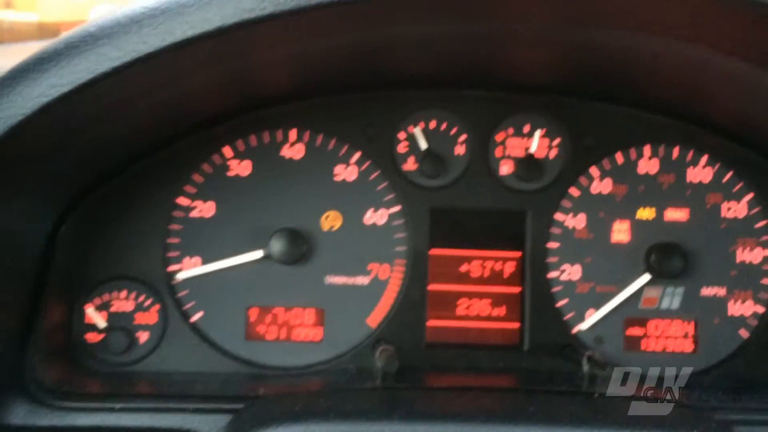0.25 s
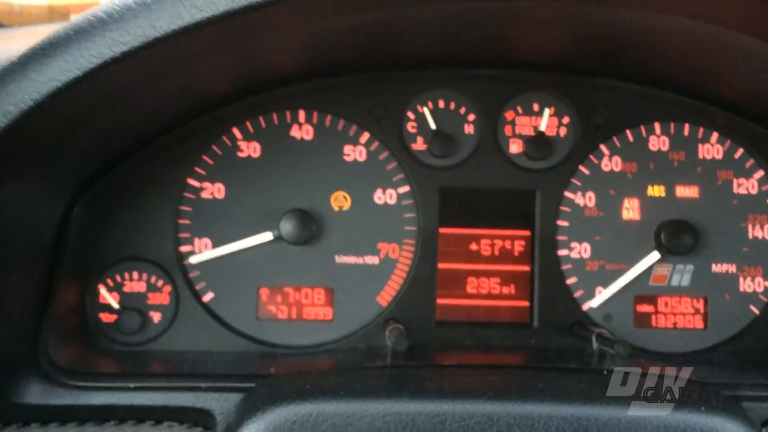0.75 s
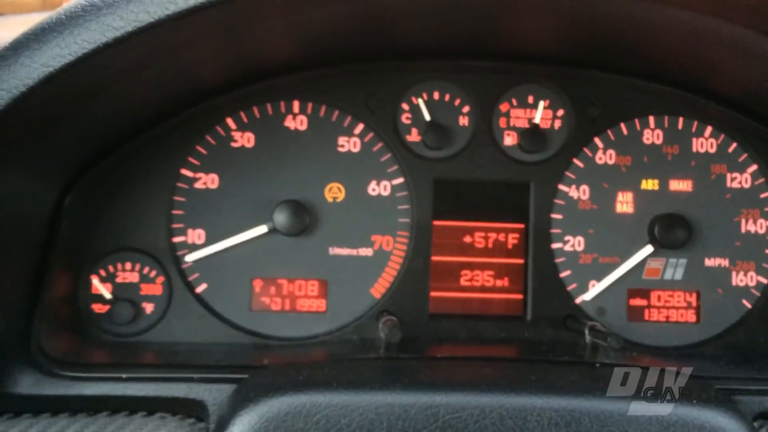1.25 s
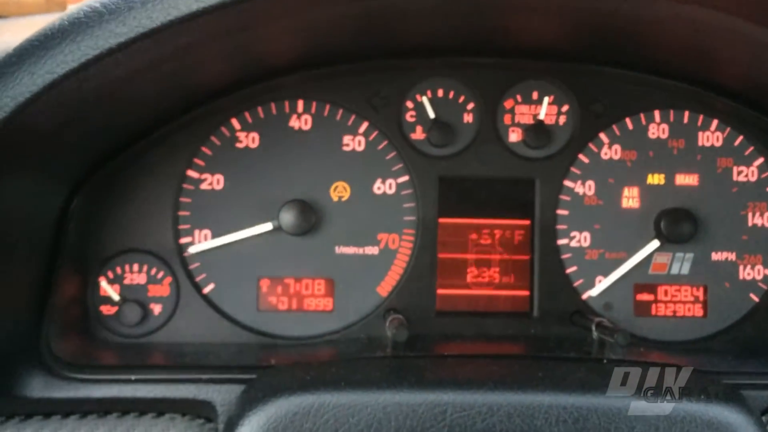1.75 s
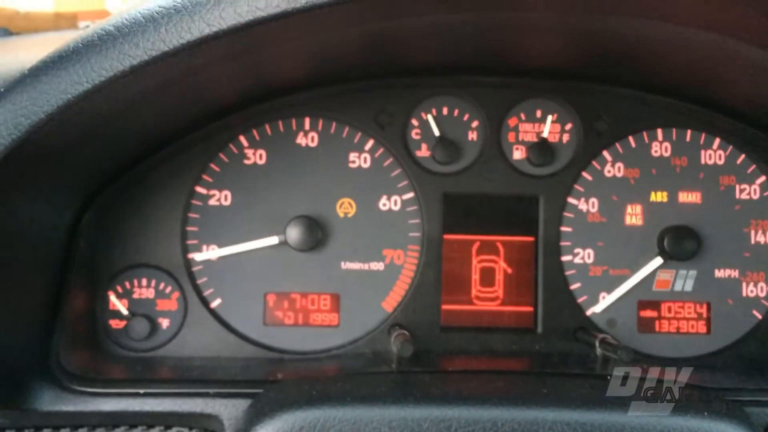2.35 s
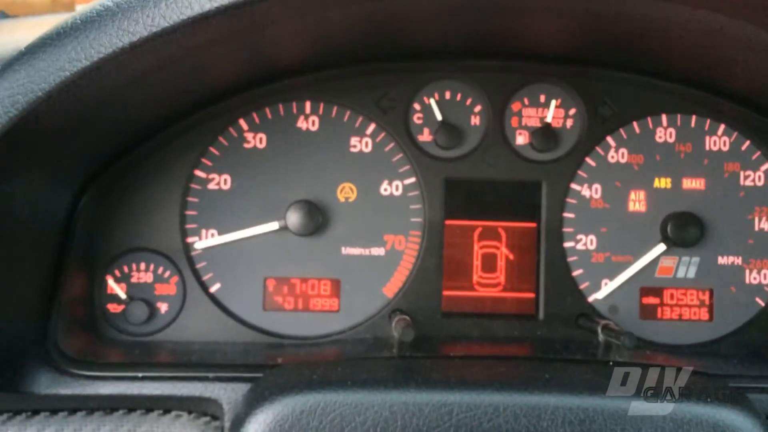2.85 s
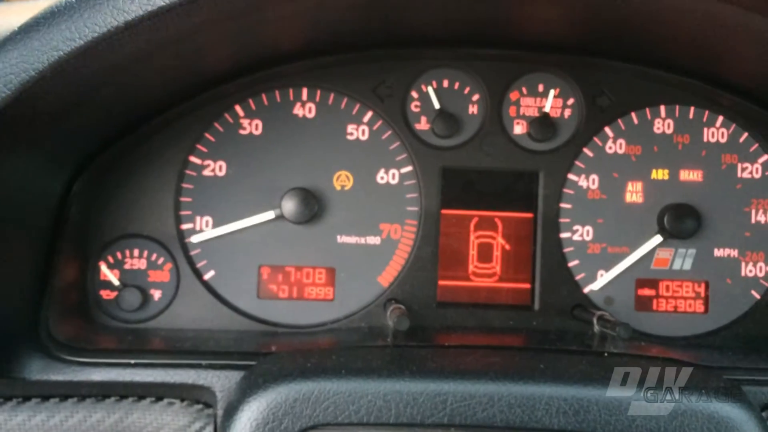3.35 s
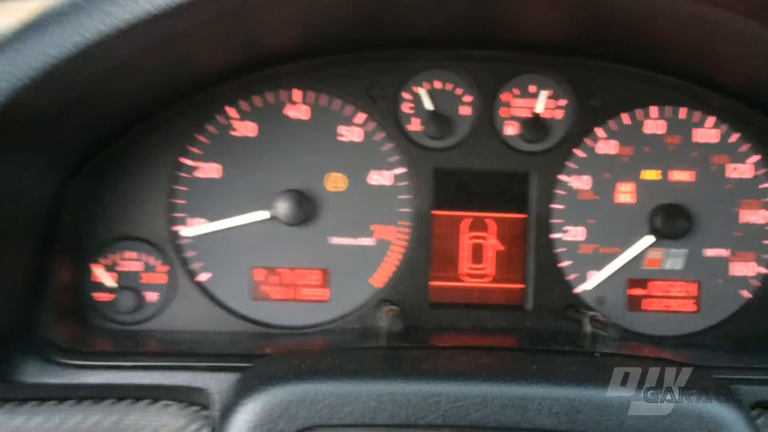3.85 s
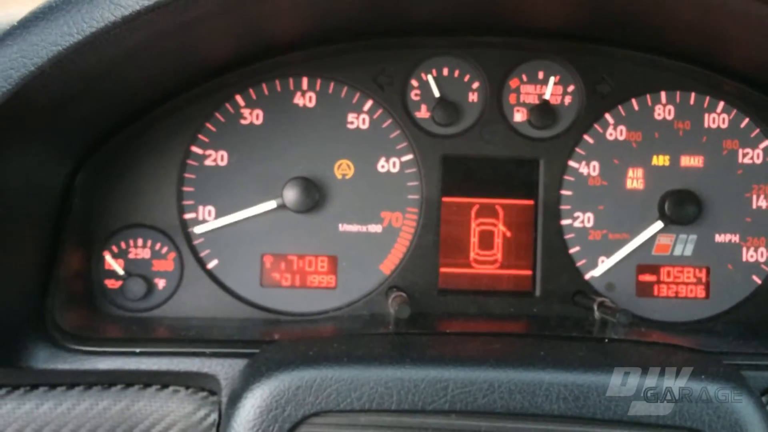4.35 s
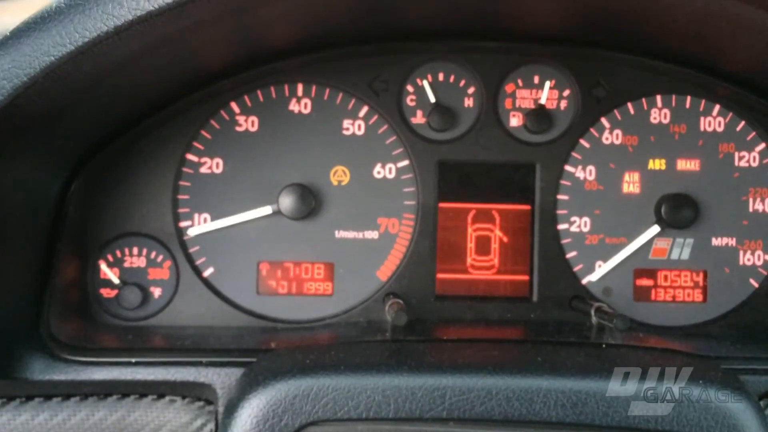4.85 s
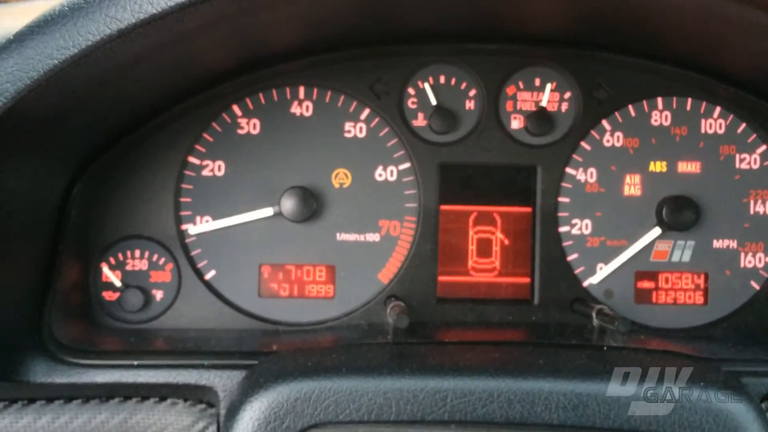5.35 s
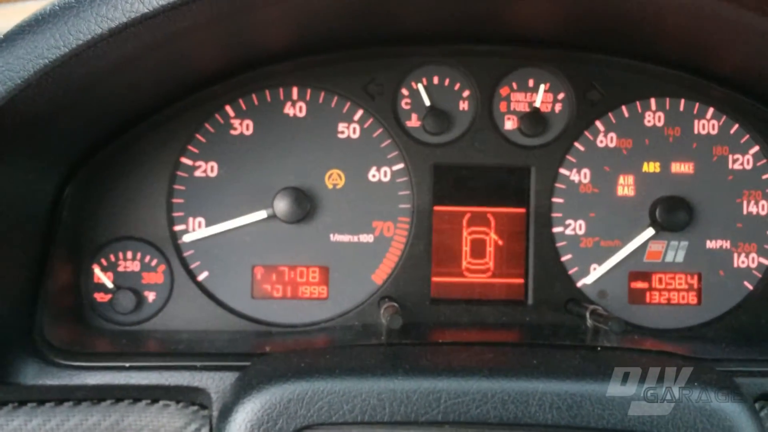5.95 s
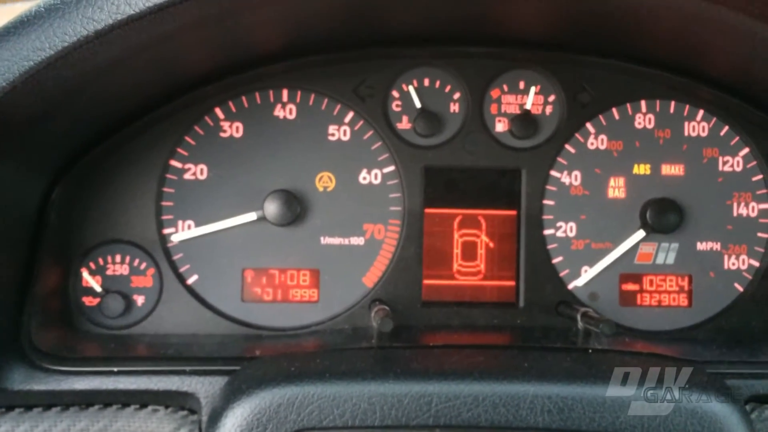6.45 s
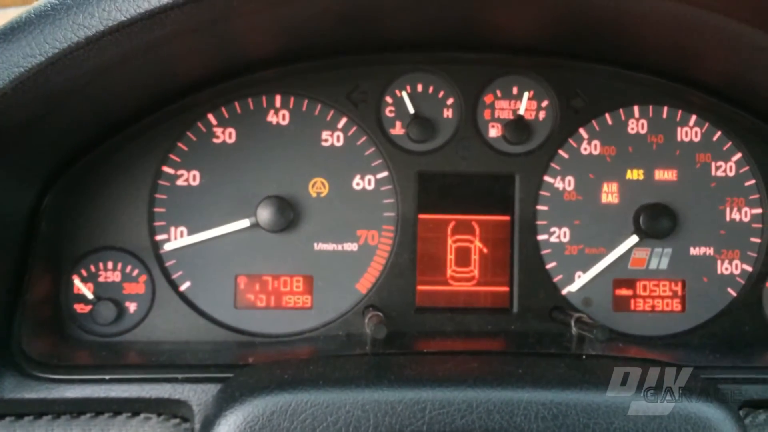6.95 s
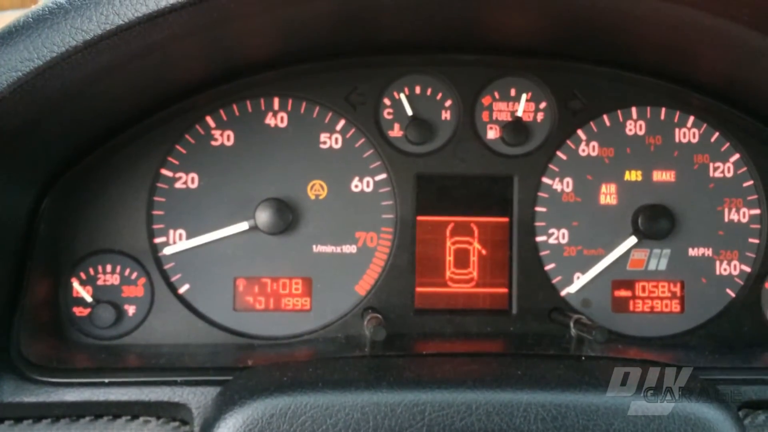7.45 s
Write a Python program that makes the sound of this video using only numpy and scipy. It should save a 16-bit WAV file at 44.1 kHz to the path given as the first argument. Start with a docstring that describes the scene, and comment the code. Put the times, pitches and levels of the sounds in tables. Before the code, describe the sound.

Inside a car, a low rough engine drone booms at idle. A sharp clack at one second coincides with the first stumble; the outside engine rush then grows louder as a latch cracks and the door swings open with clustered thuds, ringing and rubbing. The clatter thins out, leaving the engine faltering into lone thumps and surging back several times, with faint bird chirps. The drone drops again at the very end.

```python
"""A misfiring car engine idles, heard from the driver's seat; firing orders add up to its boom in the cabin.
Lock and handle clack, and the engine bay's rush, made of coloured noise, grows louder.
Then the latch lets go and the door swings open: cracks, ringing, thuds and rubbing.
Meanwhile the engine stumbles four times, with single thumps, and surges back. A few gliding tones
are faint bird calls. At the very end the drone cuts out once more."""
import sys
import numpy as np
from scipy import signal
from scipy.fft import rfft, irfft, next_fast_len
from scipy.io import wavfile
from scipy.ndimage import map_coordinates

SR = 44100
rng = np.random.default_rng(int(sys.argv[2]) if len(sys.argv) > 2 else 0)


def store_wav(level_fs):
    """Save 16-bit WAV to argv[1]."""
    pcm = np.round(np.clip(np.atleast_2d(level_fs), -1, 1) * 32767)
    wavfile.write(sys.argv[1], SR, pcm.T.astype(np.int16))


N = 340011


def amp(db):
    """Turn decibels into a gain."""
    return 10 ** (np.asarray(db) / 20)


def unit(x):
    """Scale x to rms 1."""
    return x / np.sqrt(np.mean(x ** 2) + 1e-20)


def ramp(times, values):
    """Join the points with straight lines, one value per sample."""
    return np.interp(np.arange(N) / SR, times, values)


def wobble(rate):
    """Draw a smooth random curve with this many knots a second."""
    knots = rng.standard_normal(int(N * rate / SR) + 4)
    return map_coordinates(knots, [np.arange(N) * rate / SR])


def filtered(x, response):
    """Multiply the spectrum of x by a response given as a function of frequency."""
    m = next_fast_len(2 * len(x))
    return irfft(rfft(x, m) * response(np.fft.rfftfreq(m, 1 / SR)), m)[:len(x)]


def noise(spectrum, size=N):
    """Make noise of rms 1, coloured by (Hz, dB) points."""
    f, db = np.transpose(spectrum)
    colour = lambda hz: amp(np.interp(np.log(hz + 1), np.log(f), db))
    return unit(filtered(rng.standard_normal(size), colour))


def resonances(modes, f):
    """Add up the responses of damped resonances, each a (Hz, width in Hz, dB) mode."""
    return sum(amp(db) * 1j * f * w / (c * c - f * f + 1j * f * w) for c, w, db in modes)


def ringing(modes, t, longest_s):
    """Let (Hz, dB, t60 in s) modes ring and die away, at new strengths for every blow."""
    total = np.zeros(len(t))
    for hz, db, t60 in modes:
        strength_db = db + 3 * rng.standard_normal()
        decay = amp(strength_db - 60 * t / min(t60, longest_s))
        total += decay * np.sin(2 * np.pi * (hz * t + rng.random()))
    return total


def butter(x, edge_hz, kind, order):
    """Low-pass or high-pass x without looking ahead."""
    return signal.sosfilt(signal.butter(order, edge_hz, kind, fs=SR, output="sos"), x)


def add(track, s, sound):
    """Mix a sound into the track at time s."""
    part = track[max(round(s * SR), 0):][:len(sound)]
    part += sound[:len(part)]


def fading_out(start_s, length_s):
    """Give 1 until start_s, then fall to 0 in a straight line."""
    return ramp([start_s, start_s + length_s], [1, 0])


# engine speed: t/s, firing rate f/Hz
ENGINE_SPEED = [(0.0, 44.2), (0.26, 41.15), (0.88, 40.2), (0.99, 38.9), (1.16, 29.97), (1.33, 30.95),
                (1.46, 40.3), (1.59, 45.9), (1.8, 48.83), (2.06, 49.3), (2.75, 45.25), (2.88, 42.38),
                (3.0, 32.68), (3.24, 43.96), (3.39, 46.5), (3.56, 47.73), (4.08, 43.5), (4.34, 30.96),
                (4.57, 44.25), (4.74, 47.75), (4.92, 48.65), (5.33, 45.2), (5.45, 34.74), (5.52, 33.93),
                (5.84, 45.95), (5.99, 46), (6.72, 41.89), (7.56, 40.6), (7.71, 38.6)]


def engine_speed():
    """The firing rate falls when the engine stumbles and climbs when it recovers."""
    times, rates_hz = np.transpose(ENGINE_SPEED)
    return ramp(times, rates_hz)


# stumbles: firing cuts out t/s, catches again t/s, change of drone level/dB
STUMBLES = [(1.024, 1.402, -16), (2.762, 3.156, -13.5), (4.085, 4.494, -11.5), (5.334, 5.661, -6.5),
            (7.659, 8.0, -10)]
# the drone drops within CUT_S, drifts to CREEP_DB, and returns in full within CATCH_S
CUT_S, CREEP_DB, CATCH_S = 0.032, -9, 0.065
# surges of extra fuel: t/s, level/dB
SURGES = [(0.082, 7), (1.53, 4), (2.75, 3), (3.19, 3), (4.06, 3), (4.55, 5), (5.74, 1)]
SURGE_WIDTH_S = 0.044


def effort():
    """Strength of combustion in dB: it drops in each stumble and rises in each surge."""
    t = np.arange(N) / SR
    total_db = np.zeros(N)
    for cut, catch, drop_db in STUMBLES:
        total_db += ramp([cut, cut + CUT_S, catch - CATCH_S, catch], [0, drop_db, CREEP_DB, 0])
    for s, surge_db in SURGES:
        total_db += surge_db * np.exp(-((t - s) / SURGE_WIDTH_S) ** 2)
    return total_db


# how loudly a firing order booms at the seat: f/Hz, level/dB
SEAT_BOOM = [(30, -27), (40, -25), (44, -22), (62, -18), (82, -20), (95, -22), (120, -31), (130, -30),
             (146, -31.5), (162, -31.5), (174, -25.5), (188, -19.5), (194, -23), (199, -29.5)]
# early change for firing orders 1 to 4, which then fades out: level/dB
EARLY_ORDER_DB = [-3.5, -8, 3.5, -6.5]
# the drone's balance changes from BALANCE_SHIFTS_S over SHIFT_S
BALANCE_SHIFTS_S, SHIFT_S = 1.8, 0.24


def order_levels(firing_hz):
    """Each firing order follows the effort and swells as the speed carries it through a boom."""
    hz, boom_db = np.transpose(SEAT_BOOM)
    drive_db, early = effort(), fading_out(BALANCE_SHIFTS_S, SHIFT_S)
    return [drive_db + early_db * early + np.interp(np.log(k * firing_hz), np.log(hz), boom_db)
            for k, early_db in enumerate(EARLY_ORDER_DB, 1)]


# air resonances of the cabin: f/Hz, width f/Hz, level/dB
CABIN_AIR = [(41.8, 17, -16), (82, 31, 3.5), (121.7, 28, 3), (170.9, 20.5, 0)]


def cabin(pushes, muffle_hz=215):
    """Pressure pushes boom in the cabin air; the body shuts out their upper range."""
    boom = filtered(pushes, lambda f: resonances(CABIN_AIR, f))
    return butter(boom, muffle_hz, "low", order=7)


# body panels that pick out the weak upper orders: f/Hz, width f/Hz, level/dB
BODY_PANELS = [(199, 5, -36), (285.7, 24, -45), (367.5, 17, -53.5), (466, 16, -55)]


def exhaust(firing_hz, firing_count):
    """Firing orders, whole multiples of the firing rate, drone; cylinders that burn unevenly roughen them."""
    order_db = order_levels(firing_hz)
    drone = np.zeros(N)
    for k, db in enumerate(order_db, 1):
        # the cabin's top resonance shifts the phase of the orders near it
        lag = 2 * np.angle(resonances(CABIN_AIR[-1:], k * firing_hz))
        flutter_db = 1.66 * wobble(30)
        drone += np.sqrt(2) * amp(db + flutter_db) * np.cos(2 * np.pi * k * firing_count + lag)
    power = np.sqrt(sum(amp(db) ** 2 for db in order_db))

    # upper orders stand out as they pass through a panel resonance
    upper = np.zeros(N)
    for k in range(5, 13):
        rotating = np.exp(2j * np.pi * k * firing_count)
        upper += amp(4.7 * wobble(7)) * np.real(resonances(BODY_PANELS, k * firing_hz) * rotating)

    # each firing is stronger or weaker than the mean, partly by cylinder and partly by chance
    firings = np.flatnonzero(np.diff(np.floor(firing_count)))
    by_cylinder = np.resize([0.8, -0.83, 1.5, -0.74, 0.0, -2.0], len(firings))
    pushes = np.zeros(N)
    pushes[firings] = rng.standard_normal(len(firings)) + by_cylinder
    uneven = amp(-11) * power * unit(cabin(pushes))
    shudder = amp(-37) * unit(cabin(rng.standard_normal(N)))
    return drone + upper * unit(power) + uneven + shudder


# colour of the engine bay's rush: f/Hz, level per Hz/dB
BAY_RUSH = [(100, 12), (250, 5.5), (400, 2), (600, -5), (850, -6), (1150, -11), (1500, -16), (2000, -14),
            (2600, -19.5), (3500, -24.5), (6000, -37.5), (12000, -69.5)]
# colour of the intake hiss: f/Hz, level per Hz/dB
INTAKE_HISS = [(1470, -20), (2500, -7.5), (2820, -9.5), (3420, -8), (4110, -3), (4640, -4.5), (13900, -12),
               (15500, -17)]
# ringing of the engine's covers: f/Hz, width f/Hz, level/dB
ENGINE_COVERS = [(474, 17, -8.5), (967, 20, 3), (1355, 185, 3.5), (1690, 20, 1.5)]
# colour of the growl through the bulkhead: f/Hz, level per Hz/dB
BULKHEAD_GROWL = [(20, -4.5), (60, 2.5), (200, 6), (280, -12.5), (400, -9), (520, -16), (800, -39),
                  (2500, -73)]
# rush and hiss start lower by these levels (dB) and grow louder from RUSH_GROWS_S over GROW_S
EARLY_RUSH_DB, EARLY_HISS_DB = -8, -3
RUSH_GROWS_S, GROW_S = 1.12, 0.084


def engine_bay(firing_hz, firing_count):
    """Belts, fan and valve gear rush and throb with the firings; a low growl comes through the bulkhead."""
    early = fading_out(RUSH_GROWS_S, GROW_S)
    revs = (firing_hz / firing_hz.mean()) ** 0.39  # a faster engine is louder
    throb = 1 + 0.083 * np.cos(2 * np.pi * 2 * firing_count)  # two beats per firing

    rush = unit(filtered(noise(BAY_RUSH), lambda f: 1 + resonances(ENGINE_COVERS, f)))
    rush = rush / np.std(butter(rush, 313, "high", order=4))  # its level is set above 313 Hz
    rush = amp(-43.5 + EARLY_RUSH_DB * early + 0.85 * wobble(70)) * rush

    growl = revs * amp(-42 + 0.17 * effort() + 4.3 * wobble(25)) * noise(BULKHEAD_GROWL)

    intake_db = 0.41 * np.maximum(firing_hz - 41, 0)  # above idle the intake draws more air
    hiss = amp(-61 + intake_db + EARLY_HISS_DB * early) * noise(INTAKE_HISS)
    return throb * revs * (rush + growl) + hiss


def reflections(x):
    """Glass and trim close by answer with a dense, short cluster of echoes."""
    wet_db, t60, first_s = -12, .2, .006
    t = np.arange(SR // 10) / SR
    echoes = rng.standard_normal(len(t)) * amp(-60 * t / t60) * (t > first_s)
    return x + amp(wet_db) * signal.fftconvolve(x, echoes / np.linalg.norm(echoes))[:N]


# colour of the crack of a contact: f/Hz, level per Hz/dB
CONTACT_CRACK = [(150, 8), (300, -5), (550, -4.5), (900, -4), (2000, -6.5), (3000, -7), (5000, -11),
                 (8000, -14.5), (11000, -18), (15500, -19.5)]
# the door's ringing: f/Hz, level/dB, t60 t/s
DOOR_RING = [(395, 4, 0.074), (696, 8.5, 0.05), (860, 5, 0.051), (964, 4.5, 0.064), (1081, 0, 0.065),
             (1180, -0.5, 0.089), (1400, 12, 0.036), (1600, 15.5, 0.03), (1747, 4.5, 0.084),
             (1982, 6, 0.046), (2146, 6.5, 0.057), (2394, -6.5, 0.06), (2520, 2, 0.041)]
# the steel latch's ringing: f/Hz, level/dB, t60 t/s
LATCH_RING = [(3700, 2, 0.02), (5800, -23, .07), (6980, 3, 0.076), (6750, -21, 0.043), (13300, -18, 0.099)]
# latch level for a 1 ms rise; it rings less for each tenfold rise time
LATCH_DB, LATCH_DB_PER_DECADE = -16.48, -13


def contact(rise, t60, t):
    """Two parts meet: they crack, chatter and set small parts, door and latch ringing."""
    head = slice(0, SR // 60)
    decay = amp(-60 * t / t60)
    # loose parts chatter as they meet
    chatter_db = 3 * np.interp(t, np.linspace(0, t[-1], num=160), rng.standard_normal(size=160))
    crack = noise(CONTACT_CRACK, size=len(t)) * decay * amp(chatter_db)
    # each contact has small resonances of its own, weaker towards the treble
    parts_hz = 700 * 17 ** rng.random(size=18)
    parts = decay * sum(np.sin(2 * np.pi * hz * t) * np.sqrt(2500 / hz) for hz in parts_hz)
    door = ringing(DOOR_RING, t, longest_s=2 * t60)
    latch_db = LATCH_DB + LATCH_DB_PER_DECADE * np.log10(rise / 1e-3)
    latch = amp(latch_db) * ringing(LATCH_RING, t, longest_s=2 * t60)
    blow = crack / np.std(crack[head]) + door / np.std(door[head]) + amp(-14) * parts + latch
    # a hard contact snaps at once, a sliding one swells
    snap = 1 + 0.83 * amp(-60 * t / 0.005)
    return blow * snap * (1 - np.exp(-(t / rise) ** 2))


# clicks of lock, handle, latch and trim, and one very short faint tick at 3.268 s:
# t/s, low level/dB, middle level/dB, treble level/dB, rise t/s, t60 t/s
CLICKS = [(0.026, -61, -51, -42.5, .0014, 0.075), (0.236, -43, -68, -62, 0.00017, 0.054),
          (0.27, -48, -59, -51.5, 0.00023, 0.0077), (0.328, -49, -61, -52, .0001, 0.023),
          (0.342, -49, -63, -54, 0.00036, 0.034), (0.837, -60, -56, -51.5, .0012, 0.14),
          (0.956, -18.5, -18, -28, 0.00026, 0.075), (1.098, -29.5, -45, -55, 0.00057, 0.084),
          (1.165, -23, -33.5, -46, 0.00056, 0.048), (1.211, -21, -33, -41.5, 0.0025, 0.047),
          (1.242, -42, -41, -41, 0.0024, 0.054), (1.305, -62, -34.5, -42.5, .007, 0.069),
          (1.391, -26, -35, -42, 0.0035, 0.27), (1.417, -21.5, -25, -35, 0.0006, 0.095),
          (1.473, -27.5, -36, -34, 0.00069, 0.12), (1.534, -59, -49, -38.5, 0.00092, 0.084),
          (1.554, -26.5, -24.5, -27.5, 0.0025, 0.1), (1.642, -21, -44, -31.5, 0.0038, 0.11),
          (1.654, -11.5, -10, -16.5, 0.00016, 0.077), (1.724, -30.5, -58, -64, .001, 0.13),
          (1.742, -34, -41, -51, 0.0016, .08), (1.778, -29.5, -34.5, -45.5, 0.016, 0.07),
          (1.874, -50, -45, -44, 0.00082, 0.074), (1.985, -26, -37.5, -37, .003, 0.14),
          (2.058, -26, -36.5, -23.5, 0.00033, 0.071), (2.108, -25.5, -28.5, -38, 0.00022, 0.088),
          (2.346, -38, -63, -49.5, 0.00046, 0.081), (2.392, -35, -57, -49, 0.00044, 0.18),
          (2.426, -42, -55, -48.5, 0.00044, .075), (2.473, -30.5, -69, -37.5, 0.00022, 0.058),
          (2.612, -38, -56, -47, .0003, 0.049), (3.268, -47, -57, -50, 0.00022, 0.0047),
          (5.904, -35.5, -46, -61, 0.0019, 0.066), (5.927, -40, -48, -58, 0.00082, .08)]


def clicks():
    """Hard and soft contacts differ in their shares of low, middle and treble."""
    low_hz, high_hz = 1100, 2800  # where the three bands meet
    out, t = np.zeros(N), np.arange(SR // 4) / SR
    head = slice(0, SR // 60)  # each band's level is set over this opening stretch
    for s, low_db, middle_db, treble_db, rise, t60 in CLICKS:
        blow = contact(rise, t60, t)
        low = -butter(blow, low_hz, "low", order=3)  # inverted, so that neighbouring bands join in phase
        middle = butter(butter(blow, low_hz, "high", order=3), high_hz, "low", order=3)
        # the treble dies first, and reaches less high in a soft contact
        reach_hz = np.clip(13000 * amp((treble_db - middle_db) / 4), 4000, 16000)
        top = butter(blow, reach_hz, "low", order=2) * amp(-60 * t / 0.97)
        treble = butter(top, high_hz, "high", order=5)
        for band, db in ((low, low_db), (middle, middle_db), (treble, treble_db)):
            add(out, s, amp(db) * band / np.std(band[head]))
    return out


# dull blows on door and trim panels: t/s, level/dB, main f/Hz
PANEL_THUDS = [(0.971, -18, 82), (1.165, -13, 135), (1.219, -5.5, 192), (1.319, -5, 149), (1.419, -1, 177),
               (1.471, 0.5, 171.6), (1.653, -18, 226), (1.79, -4, 161), (2.107, -8, 135), (2.475, -9, 172),
               (5.905, -17, 360), (5.93, -17.5, 496), (5.934, -24, 583)]
# a struck panel's modes: multiple of its main frequency, level/dB
PANEL_MODES = [(0.458, -5), (1.001, 0.5), (1.17, -12.5), (1.65, -16.5)]


def door_thuds():
    """A struck panel booms briefly, with lower and higher modes beside the main one."""
    t60, rise = 0.099, 0.0034  # s
    out, t = np.zeros(N), np.arange(SR // 4) / SR
    for s, db, hz in PANEL_THUDS:
        panel = sum(amp(mode_db) * np.sin(2 * np.pi * ratio * hz * t) for ratio, mode_db in PANEL_MODES)
        add(out, s, -amp(db - 60 * t / t60) * (1 - np.exp(-t / rise)) * panel)
    return out


# lone firings while the engine stumbles: t/s at the thump's peak, level/dB
LONE_FIRINGS = [(1.129, -20), (2.89, -20.5), (2.951, -19), (3.015, -28), (3.077, -16.5), (4.219, -16),
                (4.287, -25), (4.32, -21), (4.384, -17), (4.441, -15.5), (4.493, -10), (5.471, -20),
                (5.522, -17), (5.576, -14)]


def coughs():
    """In a stumble only single cylinders catch, each one a separate dull thump."""
    push = cabin(signal.unit_impulse(SR // 4), muffle_hz=150)
    peak = np.argmax(push)
    out = np.zeros(N)
    for s, db in LONE_FIRINGS:
        add(out, s - peak / SR, -amp(db) * push / push[peak])
    return out


# strokes of the handle and door as they move: t/s, length t/s, level/dB
MOVING_STROKES = [(1.407, 0.17, -43.5), (1.76, 0.15, -48)]
SCRAPE_ATTACK_S, SCRAPE_RELEASE_S = 0.047, 0.12
SLIPS_PER_S, SLIP_T60_S = 130, .06


def scrape():
    """Moving parts stick and slip in small, uneven ticks that die away fast."""
    strength = amp(6 * np.clip(rng.standard_normal(N), -2, 2))
    slips = (rng.random(N) < SLIPS_PER_S / SR) * strength
    tick = amp(-60 * np.arange(SR // 20) / SR / SLIP_T60_S)
    bursts = signal.fftconvolve(slips, tick)[:N]
    strokes = np.zeros(N)
    for s, length, db in MOVING_STROKES:
        end = s + length
        strokes += amp(db) * ramp([s - SCRAPE_ATTACK_S, s, end, end + SCRAPE_RELEASE_S], [0, 1, 1, 0])
    rub = noise(CONTACT_CRACK)
    rub = rub + amp(4) * butter(rub, 5000, "high", order=1)  # brighter than a crack
    return strokes * unit(bursts * rub)


# whistles and soft hoots of birds: t/s, length t/s, start f/Hz, end f/Hz, level/dB
BIRD_CALLS = [(3.492, 0.072, 4450, 4650, -56), (4.239, 0.096, 4125, 4590, -48),
              (4.248, 0.076, 3200, 3270, -59), (4.26, .032, 2390, 2610, -45),
              (4.342, 0.077, 6170, 6600, -50), (4.403, 0.096, 6800, 4570, -57.5),
              (4.5, 0.13, 4704, 4280, -60.5), (5.461, 0.03, 4600, 4640, -49),
              (5.526, 0.054, 603, 581.4, -36.5), (5.573, 0.047, 3440, 3410, -50),
              (6.17, .097, 4444, 4533, -47), (6.193, .066, 3220, 3260, -59), (6.32, 0.18, 3680, 3500, -66),
              (7.258, 0.054, 3330, 3350, -54)]


def birds():
    """Thin tones from outside glide quickly to their note and settle on it."""
    glide_s, fade_s = 0.019, .02
    out = np.zeros(N)
    for s, length, start_hz, end_hz, db in BIRD_CALLS:
        t = np.arange(round(length * SR)) / SR
        note = end_hz + (start_hz - end_hz) * np.exp(-t / glide_s)
        waver = 0.01 * (1 - t / length) * wobble(300)[:len(t)]  # the start is hoarse
        phase = 2 * np.pi * np.cumsum(note * (1 + waver)) / SR
        swell = np.clip(np.minimum(t, length - t) / fade_s, 0, 1)
        add(out, s, amp(db) * swell * np.sin(phase))
    return out


def scene():
    """Engine, door and birds come together at the driver's seat."""
    firing_hz = engine_speed()
    firing_count = np.cumsum(firing_hz * (1 + 0.0047 * wobble(25))) / SR  # with a slight jitter
    engine = exhaust(firing_hz, firing_count) + coughs()
    outside = reflections(engine_bay(firing_hz, firing_count) + birds())
    contacts = clicks() + door_thuds() + scrape()
    return (engine + outside + contacts)[None]


TOP_HZ = 15350


def record(dry):
    """Anything beyond full scale clips; a very steep filter removes what lies above TOP_HZ."""
    clipped = np.clip(dry[0], -1, 1)
    return filtered(clipped, lambda hz: 1 / (1 + (hz / TOP_HZ) ** 120))[None]


dry = scene()
out = record(dry)
store_wav(out)
```